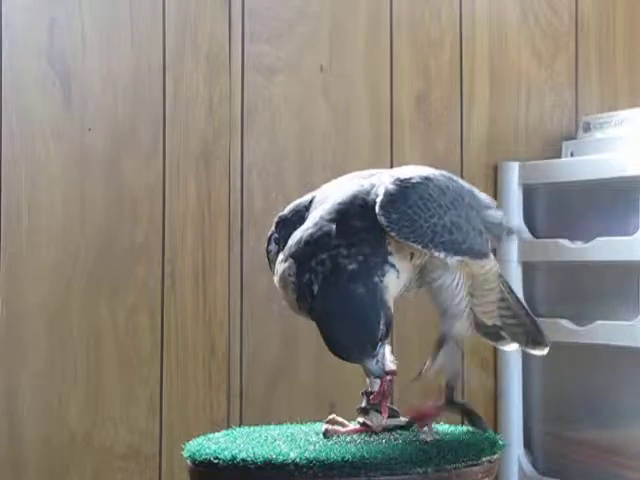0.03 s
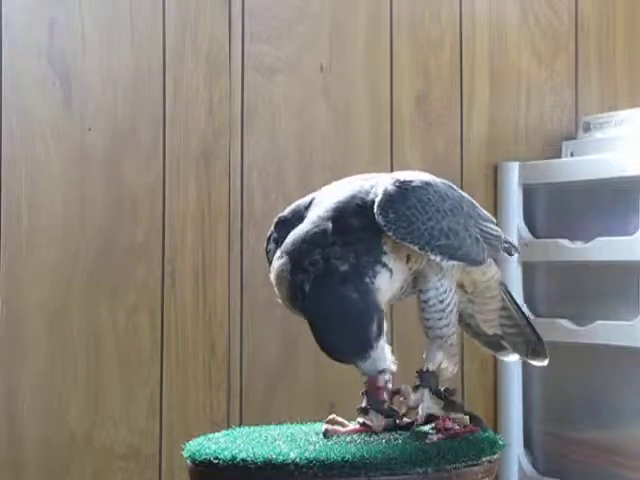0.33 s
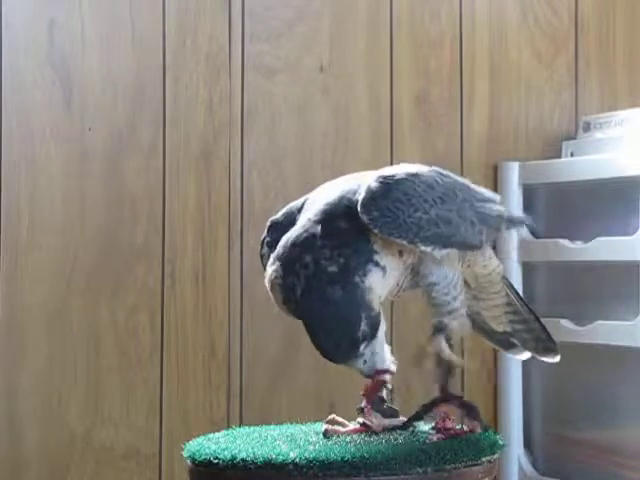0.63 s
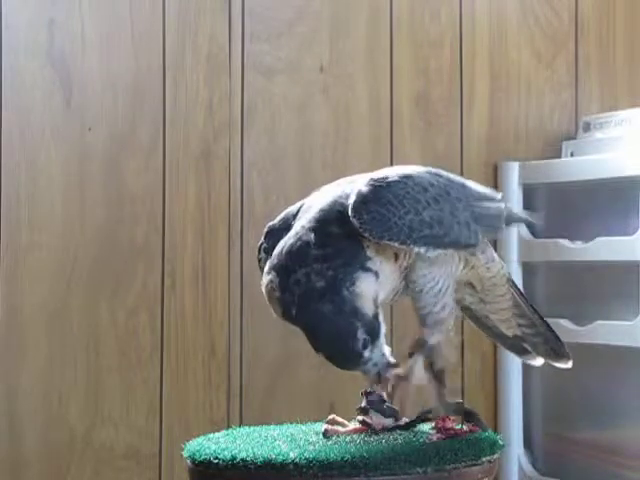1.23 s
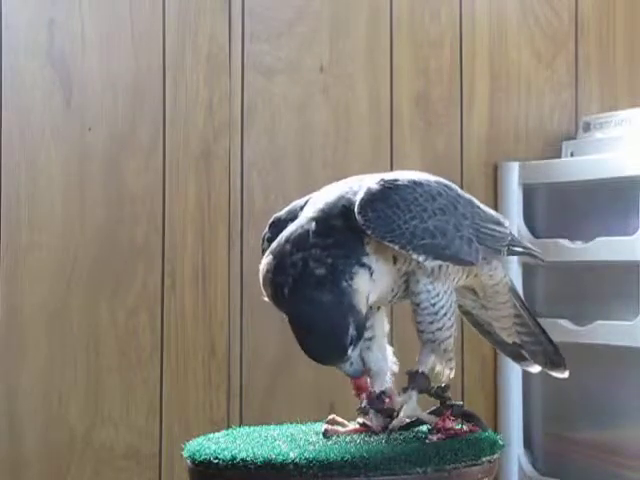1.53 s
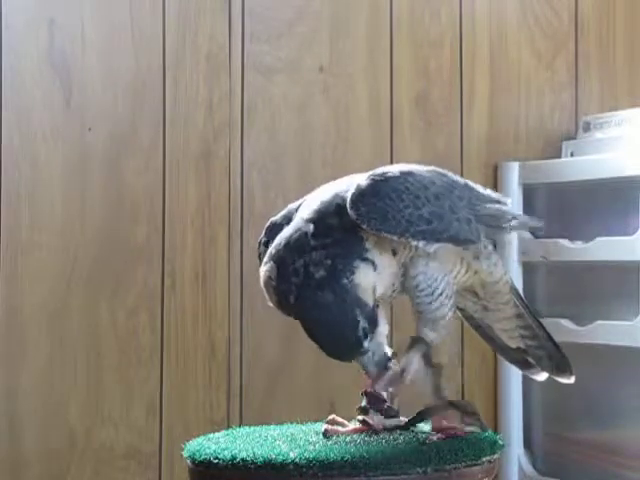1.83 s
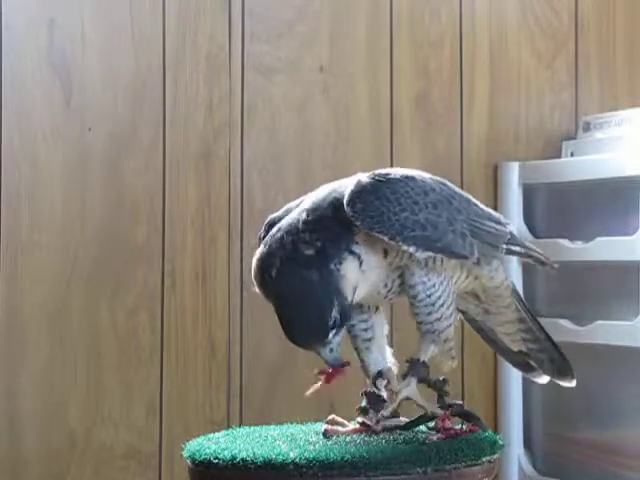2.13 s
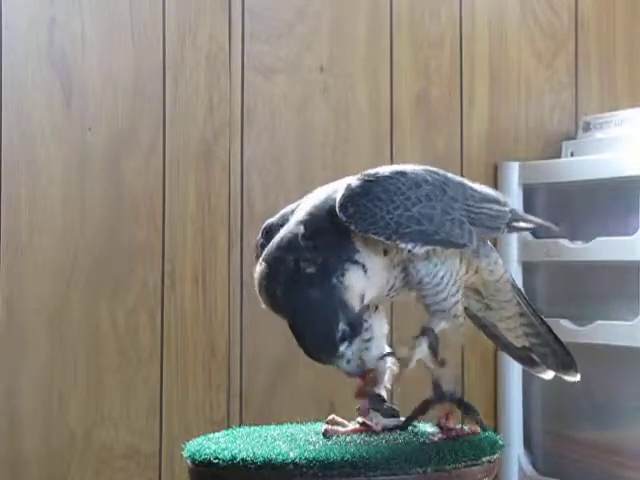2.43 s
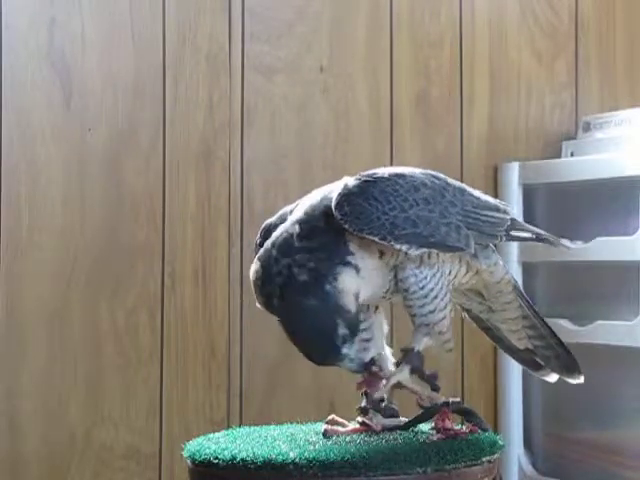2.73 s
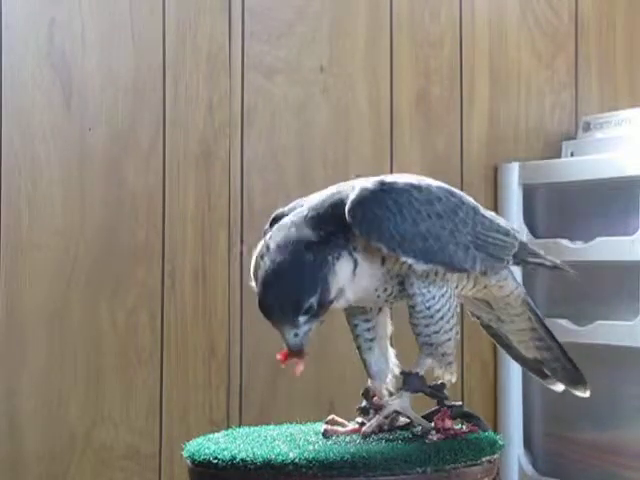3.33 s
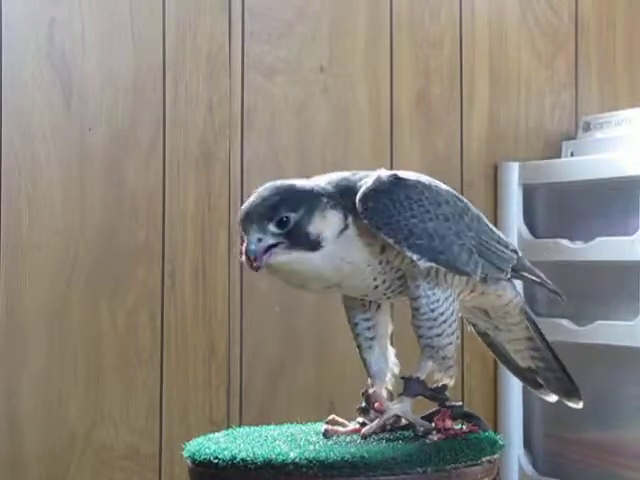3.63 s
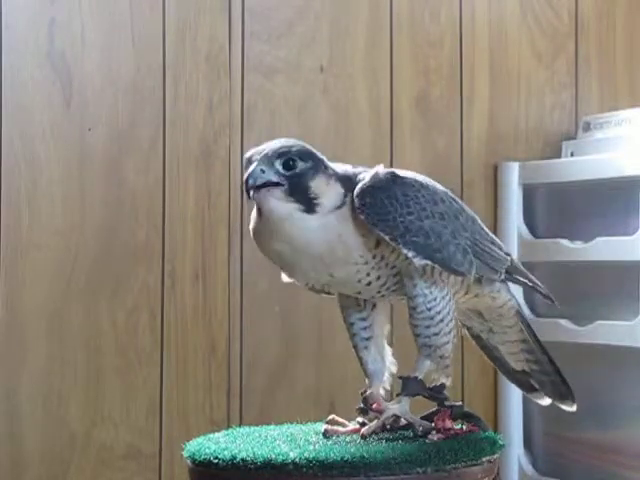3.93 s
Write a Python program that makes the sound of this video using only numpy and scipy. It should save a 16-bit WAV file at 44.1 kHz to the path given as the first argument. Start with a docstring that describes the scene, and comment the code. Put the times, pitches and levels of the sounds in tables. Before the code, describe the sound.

A bird's small leg bell clinks among scuffs and food tearing in a quiet room.

```python
"""In a small panelled room a falcon feeds on a padded perch.
Its leg bell clinks as it shifts a foot: a pellet strikes the shell and excites its damped modes.
Scuffs, tearing food and dull bumps are stick-slip friction, and the scuffs set thin metal ringing.
Hollow knocks and the ticks of the beak are brief impacts, each heard through one broad resonance.
An appliance hums under the low rumble and hiss of the room."""
import sys
import numpy as np
from scipy import signal
from scipy.fft import rfft, irfft
from scipy.io import wavfile

SR = 44100
rng = np.random.default_rng(int(sys.argv[2]) if len(sys.argv) > 2 else 0)


def file_out(sig):
    """Save sig as 16-bit WAV at sys.argv[1]."""
    # one column per channel
    cols = np.atleast_2d(sig).T
    # limit, then scale
    lim = np.clip(cols, -1, 1)
    pcm = np.round(lim * 32767).astype(np.int16)
    wavfile.write(sys.argv[1], SR, pcm)


N = 176400
TIME, FREQ = np.arange(N) / SR, np.maximum(np.arange(N // 2 + 1) * SR / N, 1)
SHRILL_HZ, SQUEAK_HZ, RING_HZ, PING_HZ = 11100, 10850, 3875, 4950  # modes of the rubbed metal
LEFT_RIGHT = np.array([[1], [-1]])


def amp(db):
    """Amplitude ratio: a factor of ten for every 20 dB."""
    return np.exp(np.asarray(db) * (np.log(10) / 20))


def unit(x):
    """Normalisation to an rms of 1."""
    return x / np.sqrt(np.mean(x ** 2) + 1e-20)


def at_hz(points, hz):
    """Interpolation along a logarithmic frequency axis."""
    frequencies, values = np.transpose(points)
    return np.interp(np.log(hz), np.log(frequencies), values)


def colour(points):
    """Spectral envelope: the gain at each frequency, from a table of levels."""
    return amp(at_hz(points, FREQ))


def resonance(hz, width_hz):
    """Complex frequency response of a damped oscillator."""
    return 1 / (1 + 1j * (FREQ ** 2 - hz ** 2) / (FREQ * width_hz))


def filtered_noise(response):
    """Source and filter: white noise takes the spectrum of the response; rms 1."""
    return unit(irfft(rfft(rng.standard_normal(N)) * response, N))


def wander(rate_hz):
    """Low-passed noise drifts slowly about zero; rms 1."""
    return filtered_noise(1 / (1 + (FREQ / rate_hz) ** 2) ** 2)


def stereo_noise(correlations):
    """Partial coherence: two noise spectra share one part in phase and one in antiphase."""
    mid, side = rfft(rng.standard_normal((2, N)))
    correlation = np.clip(at_hz(correlations, FREQ), -.99, .99)
    return np.sqrt(1 + correlation) * mid + np.sqrt(1 - correlation) * side * LEFT_RIGHT


def stroke(start_s, level_db, attack_s, hold_s, fade_db_per_s):
    """Amplitude envelope: linear rise, hold, exponential decay."""
    out, i = np.zeros(N), max(int(start_s * SR), 0)
    t = TIME[i:i + SR // 2] - start_s
    rise = np.clip(t / attack_s, 0, 1)
    out[i:i + len(t)] = rise * amp(level_db - fade_db_per_s * np.maximum(t - attack_s - hold_s, 0))
    return out


def snap(start_s, decay_s):
    """A short contact is broadband: noise under an exponential decay."""
    out, i = np.zeros(N), int(start_s * SR)
    t = TIME[:SR // 8]
    out[i:i + len(t)] = (np.exp(-t / decay_s) * rng.standard_normal(len(t)))[:N - i]
    return out


def friction(strokes, response, slips_per_s=5000, spread_db=3.0):
    """Stick-slip friction: dense random impulses of uneven size, filtered by the surface."""
    slips = (rng.random(N) < slips_per_s / SR) * rng.choice([-1, 1], N)
    sizes = amp(spread_db * np.minimum(rng.exponential(1, N), 4))
    spectrum = rfft(slips * sizes) * response * FREQ / (FREQ + 100)  # the deep bass rolls off
    octaves = np.log2(FREQ)
    return sum(stroke(*shape) * unit(irfft(spectrum * amp(tilt * octaves), N))
               for *shape, tilt in strokes)


def taps(events, decay_s, q):
    """Impact excitation: each noise burst drives one broad resonance; its level sets its energy."""
    out, t = np.zeros(N), TIME[:SR // 16]
    for start_s, level_db, centre_hz in events:
        edges_hz = centre_hz * np.exp(np.array([-1, 1]) / (2 * q))
        band = signal.butter(2, edges_hz, "band", fs=SR, output="sos")
        burst = np.exp(-t / decay_s) * rng.standard_normal(len(t))
        tap = unit(signal.sosfilt(band, burst)) * np.sqrt(decay_s * SR / 2 / len(t))
        i = int(start_s * SR)
        out[i:i + len(t)] += (amp(level_db) * tap)[:N - i]
    return out


def room_noise(level_db=-43.5):
    """Ambient rumble and hiss: the longer the wave, the more alike it is at left and right."""
    # spectrum of the ambient noise: frequency_hz, gain_db
    spectrum = [(12, -27), (20, -5.5), (44, -2.5), (85, -2), (148, -9.5), (191, -19.5), (225, -13),
                (252, -9), (274, -12.5), (306, -16.5), (342, -16), (416, -20), (857, -24.5), (1010, -23.5),
                (1270, -29), (7730, -40.5), (15500, -51.5)]
    # its likeness at left and right: frequency_hz, correlation
    coherence = [(30, 0.92), (120, 0.91), (300, 0.8), (600, 0.73), (1500, 0.25), (4000, 0.1), (12000, 0.1)]
    return amp(level_db) * unit(irfft(stereo_noise(coherence) * colour(spectrum), N))


def appliance_hum(flutter_depth=0.074):
    """A line spectrum with slight random modulation of frequency and amplitude."""
    # partials of the hum: pitch_hz, level_db, waver_hz
    partials = [(116, -54, 4.63), (167.1, -57.5, 4.2), (250.8, -44, 0.26), (1035, -74.5, 3.15)]
    hum = np.zeros(N)
    for pitch_hz, level_db, waver_hz in partials:
        phase = 2 * np.pi * np.cumsum(pitch_hz + waver_hz * wander(rate_hz=7.14)) / SR
        hum += amp(level_db) * np.sqrt(2) * np.sin(phase)
    return hum * (1 + flutter_depth * wander(rate_hz=2.2))


def scuffs():
    """Forced vibration: friction drives a surface's broad resonances, and metal rings in sympathy."""
    # dry scuffs: start_s, level_db, attack_s, hold_s, fade_db_per_s, tilt_db_per_octave
    strokes = [(-.02, -37, 0.0073, 0.014, 250, -3), (.038, -37, 0.019, 0.018, 238, -.3),
               (.595, -49.5, .04, .01, 200, -1.5), (.645, -38, 0.014, 0.035, 243, -2),
               (.772, -27, 0.011, 0.0072, 245, -1.5), (.822, -42.5, 0.0079, 0.022, 350, 5),
               (.903, -38.5, 0.011, 0.021, 243, .5), (1.478, -44.5, 0.015, 0.0063, 240, -2.5),
               (1.842, -41.5, 0.019, 0.03, 320, -3.5), (2.8, -59, 0.015, 0.036, 150, 0),
               (2.942, -52, 0.0066, 0.0061, 300, -3), (3.21, -49, 0.014, 0.032, 122, -4),
               (3.262, -51, 0.0097, 0.026, 240, -4)]
    # spectrum of the friction: frequency_hz, gain_db
    spectrum = [(150, -2), (300, 2), (600, 5), (1200, 2), (2300, 3.5), (3300, -3), (5200, -11.5),
                (7000, -16.5), (12000, -24), (15500, -58)]
    # resonances of the scuffed surface: pitch_hz, width_hz, gain_db
    surface_modes = [(631, 40, 0.5), (760, 39, 2), (1114, 66, 5), (1656, 110, 0.5), (2480, 290, -11.5)]
    # lightly damped modes of the metal: pitch_hz, width_hz, gain_db
    metal_modes = [(1737, 7, 6), (1762, 9, -3), (RING_HZ, 14, 5)]
    surface = 1 + sum(amp(db) * resonance(hz, width) for hz, width, db in surface_modes)
    metal = sum(amp(db) * resonance(hz, width) for hz, width, db in metal_modes)
    rubbing = friction(strokes, colour(spectrum) * surface)
    ringing = irfft(rfft(rubbing) * metal, N)
    return rubbing + ringing


def leg_bell(main_mode_hz=6390, rebound_s=.009, spread_db=1.5, contact_db=-3, rattle_db=-14):
    """Modal ringing: the pellet strikes the shell, rattles, and excites it again on the rebound."""
    # strikes of the pellet: start_s, level_db, tilt_db_per_octave, hardness_db
    clinks = [(0.129, -50.5, -2, -15), (.712, -48, -5, -10), (.7625, -38.5, 0.5, 0), (1.118, -53, -4, -8),
              (1.156, -43.5, -0.5, -14), (1.2578, -35, 3.5, 0), (1.892, -33, 3, 0.5),
              (2.627, -41.5, -3, -4)]
    # modes of the shell: pitch_hz, gain_db, t60_s, rebound_db, hardness_share
    modes = [(2470, -12, 0.064, 0, 0.35), (2750, -8, 0.081, -6, 0.43), (3835, -4.5, 0.043, -19, 0),
             (4151, -4.5, 0.086, -16, 0), (6390, -0.5, 0.061, -39, 0.53), (9304, -10, 0.14, 6, 0.25),
             (9460, -8.5, 0.1, 3, 0.052), (9700, -4, 0.088, -1, 0), (10170, -16, 0.057, -4, 0.67),
             (10600, -26, .06, 2, 0.29), (10730, -12.5, 0.075, 2, 0.28), (11670, -23, .08, -8, 0),
             (13750, -17, .05, -3, 0)]
    ringing, contact = np.zeros(N), np.zeros(N)
    for start_s, level_db, tilt, hardness_db in clinks:
        i = int(start_s * SR)
        t = TIME[:min(SR // 2, N - i)]
        late = t - rebound_s * rng.uniform(.9, 1.1)  # time since the rebound
        for hz, gain_db, t60_s, rebound_db, share in modes:
            strike = np.sin(2 * np.pi * hz * t) * np.exp(-np.log(1000) * t / t60_s)
            rebound = (late > 0) * np.cos(2 * np.pi * hz * t) * np.exp(-np.log(1000) * late / t60_s)
            timbre_db = gain_db + tilt * np.log2(hz / main_mode_hz) + hardness_db * share
            strength = amp(level_db + timbre_db + spread_db * rng.standard_normal())
            ringing[i:i + len(t)] += strength * (strike + amp(rebound_db) * rebound)
        contact += amp(level_db + contact_db) * snap(start_s, decay_s=.0014)
        contact += amp(level_db + rattle_db) * snap(start_s, decay_s=0.021)
    contact_band = signal.butter(2, [2000, 9500], "band", fs=SR, output="sos")
    return ringing + signal.sosfilt(contact_band, contact)


def singing_metal():
    """Resonance: rubbed thin metal picks a narrow band out of the friction noise and sings."""
    # rubs: start_s, level_db, attack_s, hold_s, fade_db_per_s, pitch_hz, width_hz
    rubs = [(0.644, -54, .018, 0.019, 170, SHRILL_HZ, 650), (.908, -50, 0.0083, 0.018, 194, SQUEAK_HZ, 180),
            (0.782, -40.5, 0.034, 0.033, 132, RING_HZ, 70), (2.95, -60, .006, .035, 200, PING_HZ, 380), ]
    return sum(stroke(*shape) * filtered_noise(resonance(hz, width) ** 2) for *shape, hz, width in rubs)


def rasping_metal(squeak_db=0.5):
    """Modal superposition: hard scuffs drive high modes of alternating polarity, and a squeak."""
    # rasps: start_s, level_db, attack_s, hold_s, fade_db_per_s, tilt_db_per_octave
    strokes = [(.777, -38.5, 0.0077, 0.013, 211, 0.17), (.905, -51.5, 0.016, 0.029, 190, -1.2)]
    # resonances of the rasped metal: pitch_hz, width_hz, gain_db
    modes = [(5000, 460, 5), (5570, 350, 1), (7300, 1700, -9), (11700, 250, -7), (12200, 680, -8),
             (13600, 980, -12)]
    body = sum((-1) ** k * amp(db) * resonance(hz, width) for k, (hz, width, db) in enumerate(modes))
    squeak = amp(squeak_db) * resonance(SQUEAK_HZ, width_hz=410) ** 2
    return friction(strokes, body + squeak)


def tearing_food():
    """Food gives way in many tiny slips, whose impulses merge into bright noise."""
    # tears: start_s, level_db, attack_s, hold_s, fade_db_per_s, tilt_db_per_octave
    strokes = [(1.776, -44.5, 0.011, 0.013, 200, 0), (1.83, -65, .01, .03, 150, -8),
               (2.84, -57, 0.014, 0.023, 150, -5), (2.948, -55, 0.0035, 0.02, 130, -4),
               (3.21, -59.5, .03, .06, 150, -2), (3.56, -59.5, .006, .015, 151, -5),
               (3.687, -60, .004, .01, 250, 11)]
    # spectrum of the tearing: frequency_hz, gain_db
    spectrum = [(1000, -9), (2500, 0), (4000, 3), (5200, 5.5), (8500, 6), (12500, 0), (15500, -9)]
    return friction(strokes, colour(spectrum))


def bumps():
    """Heavily damped low resonances: dull bumps, during which something hollow knocks and wobbles."""
    # bumps: start_s, level_db, attack_s, hold_s, fade_db_per_s, tilt_db_per_octave
    strokes = [(1.9, -38.5, .006, 0.011, 200, -5.5), (1.943, -43.5, .004, 0.015, 174, 3.5),
               (1.99, -55, 0.0049, 0.012, 141, 6)]
    # spectrum of the bumps: frequency_hz, gain_db
    spectrum = [(80, -9), (180, -19), (330, -4.5), (500, 0), (780, 2.5), (1000, -8), (1500, -22),
                (4000, -32.5), (12000, -53)]
    # hollow knocks: start_s, level_db, centre_hz
    knocks = [(1.905, -28, 496), (1.925, -32, 194), (1.9435, -24.5, 735), (1.96, -30, 593),
              (1.971, -36, 940)]
    return friction(strokes, colour(spectrum)) + taps(knocks, decay_s=0.0025, q=3.7)


def beak_ticks():
    """Transients: the beak's contacts are so brief and damped that they have little pitch."""
    # wet ticks and crunches: start_s, level_db, centre_hz
    ticks = [(2.599, -42, 6500), (2.951, -43, 8600), (3.22, -38, 5300), (3.228, -40, 4870),
             (3.23, -37.5, 2460), (3.243, -46, 12000), (3.272, -33, 1680), (3.285, -31.5, 1320),
             (3.288, -30.5, 2130), (3.295, -49, 2300), (3.399, -41.5, 4150), (3.401, -45.5, 8000),
             (3.551, -44, 5470), (3.567, -43.5, 9000), (3.577, -45, 12000), (3.604, -52, 6500),
             (3.768, -47, 3800), (3.837, -49, 6400), (3.927, -36.5, 4140), (3.938, -46, 3800),
             (3.953, -37, 3240), (3.966, -50, 3900), (3.98, -48, 4300)]
    return taps(ticks, decay_s=.0011, q=2)


def room_response(delay_s=0.0056):
    """Diffuse reverberation of unit energy: each band decays exponentially, the bass most slowly."""
    # reverberation times: frequency_hz, t60_s
    decay_times = [(200, 0.96), (700, 0.35), (2500, 0.51), (6000, 0.44), (10000, 0.22), (15000, 0.43)]
    # likeness of the reverberation at left and right: frequency_hz, correlation
    coherence = [(200, 1), (600, 0.88), (1200, 0.49), (2500, 0.085), (10000, -0.56)]
    noise, t, tail = stereo_noise(coherence), TIME[:SR], 0
    edges_hz = np.geomspace(60, 18000, 11)
    for low, high in zip(edges_hz, edges_hz[1:]):
        band = irfft(noise * ((FREQ >= low) & (FREQ < high)), N)[:, :SR]
        t60_s = at_hz(decay_times, np.sqrt(low * high))
        tail = tail + band * np.exp(-np.log(1000) * t / t60_s)
    tail = tail * (t > delay_s)
    return tail / np.sqrt(np.sum(tail ** 2) / 2)


def scene():
    """Superposition: over the steady background, each event arrives directly and by way of the room."""
    echo = room_response()
    out = room_noise() + appliance_hum()
    # sound, room_db (relative to direct), pan_db (left over right), lag_samples (left behind right)
    sources = [(leg_bell(), -3, 1.5, 0.87),
               (scuffs() + singing_metal() + rasping_metal(), -1.5, -0.8, 0),
               (bumps(), -4.5, -0.8, 0),
               (tearing_food(), -1.5, 1.0, -0.94),
               (beak_ticks(), 0, 1.0, -0.94)]
    for sound, room_db, pan_db, lag_samples in sources:
        reverberant = amp(room_db) * signal.fftconvolve(sound[None], echo, axes=1)[:, :N]
        phase_shift = np.exp(-1j * np.pi * FREQ / SR * lag_samples * LEFT_RIGHT)
        direct = irfft(rfft(sound) * phase_shift, N)
        pan = amp(pan_db * LEFT_RIGHT / 2)
        out = out + pan * (direct + reverberant) / np.hypot(1, amp(room_db))
    return out


def record(dry):
    """Band limiting: an elliptic low-pass filter cuts the top steeply."""
    cutoff_hz = 15800
    return signal.sosfilt(signal.ellip(12, .1, 80, cutoff_hz, fs=SR, output="sos"), dry)


dry = scene()
out = record(dry)
file_out(out)
```